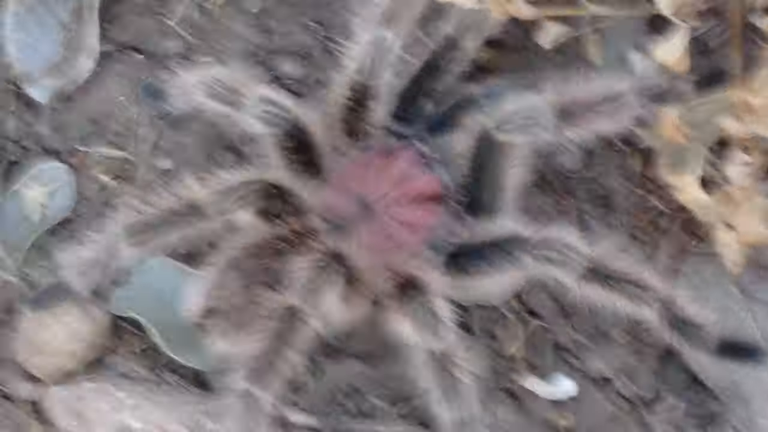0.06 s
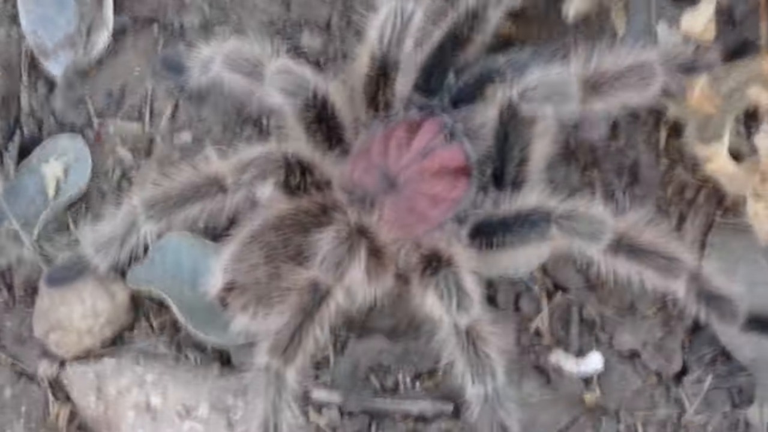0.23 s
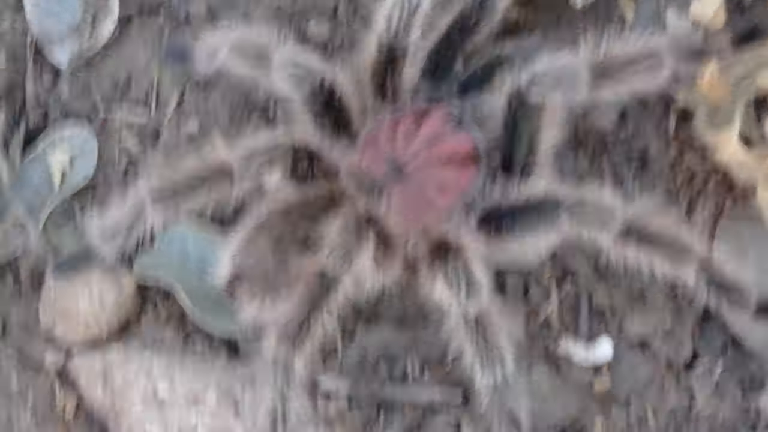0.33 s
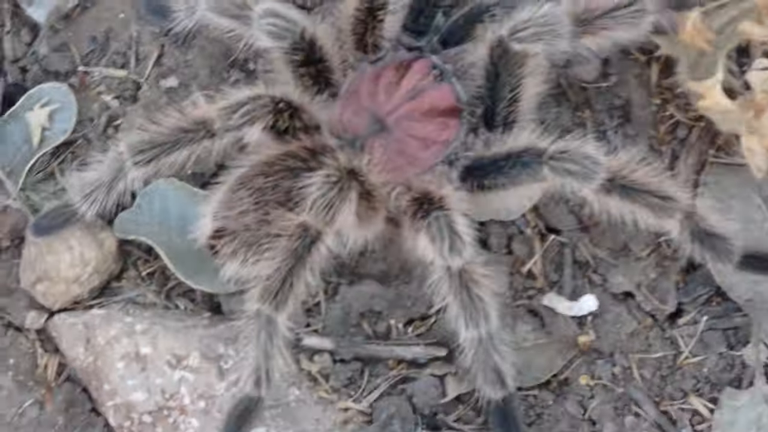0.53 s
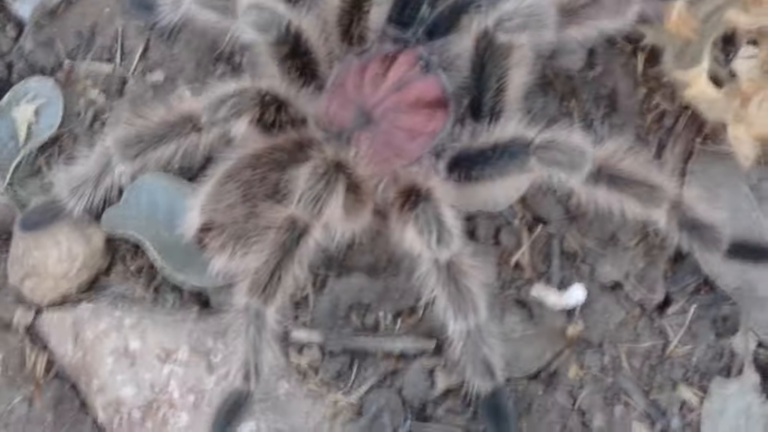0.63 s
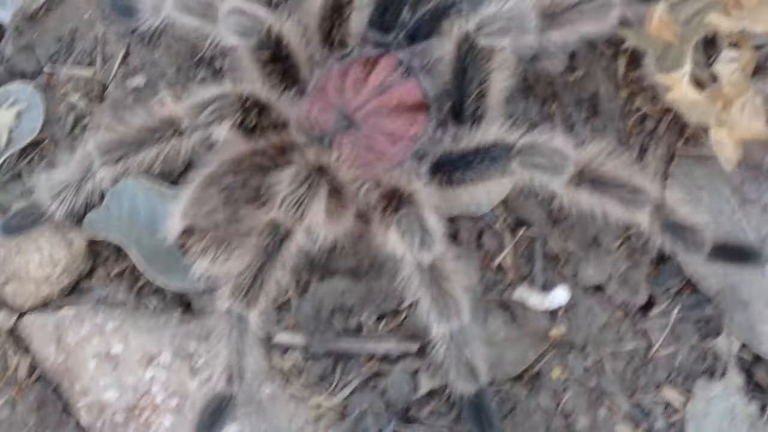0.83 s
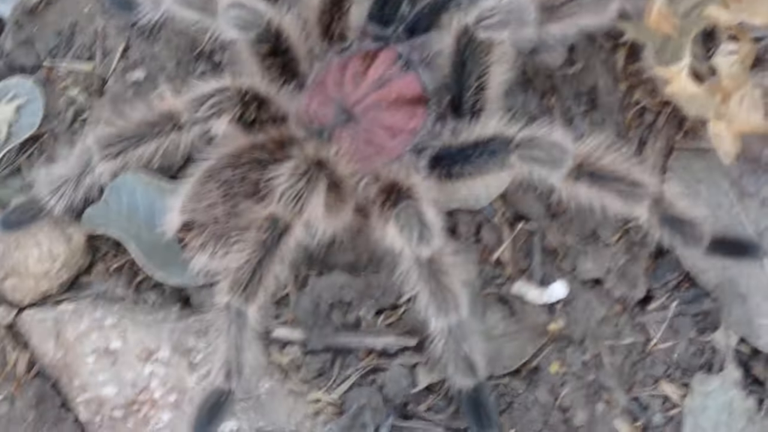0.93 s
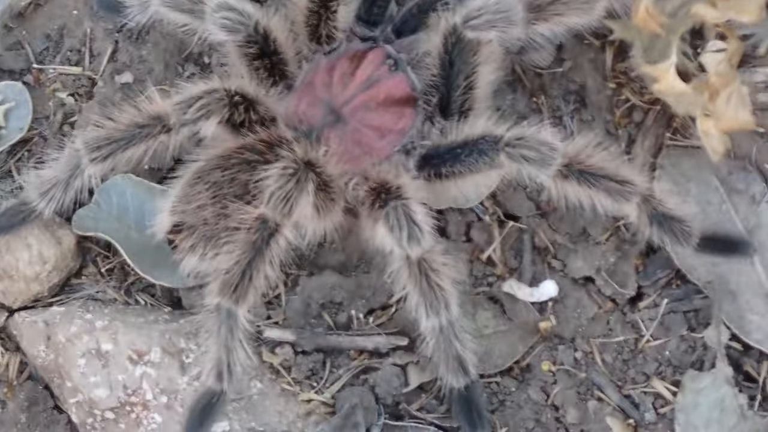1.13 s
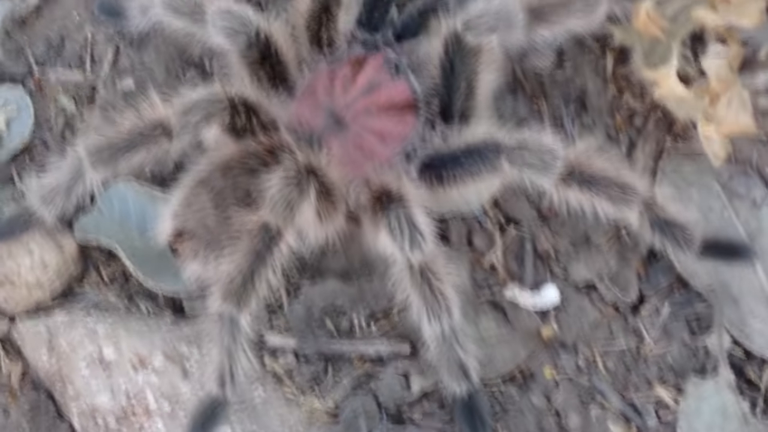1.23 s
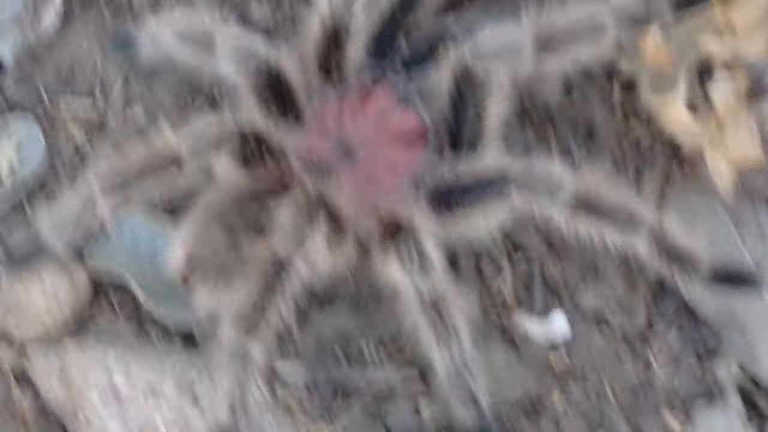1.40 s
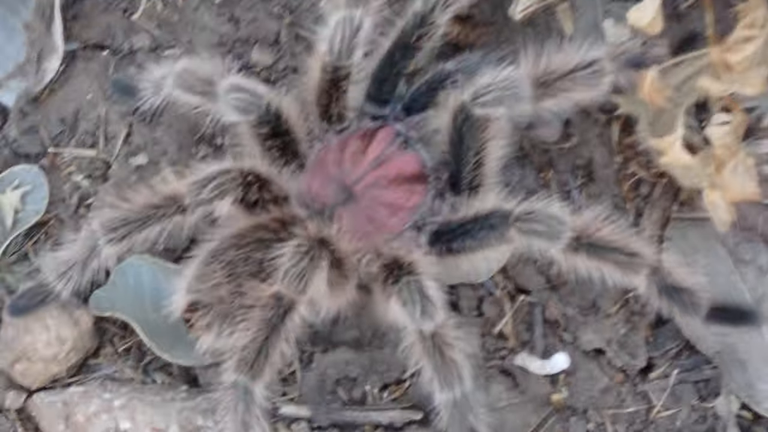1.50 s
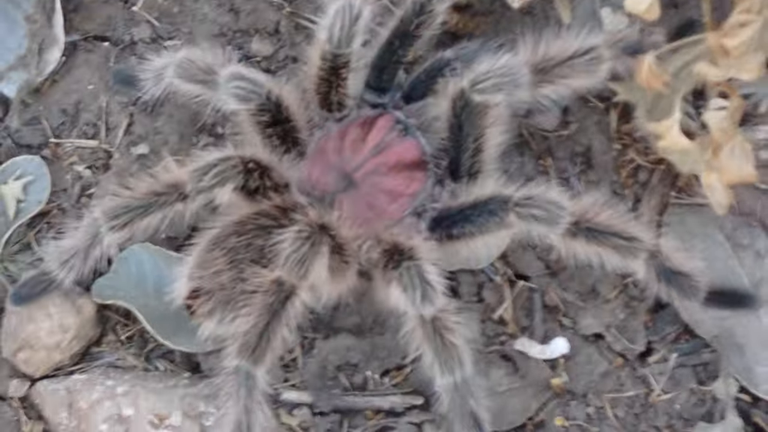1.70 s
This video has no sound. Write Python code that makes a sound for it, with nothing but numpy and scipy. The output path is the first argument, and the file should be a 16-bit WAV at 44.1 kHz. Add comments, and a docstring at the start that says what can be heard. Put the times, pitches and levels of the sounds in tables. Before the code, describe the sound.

Small, sharp, irregular snaps from a gripped camera body, with soft steady hiss behind.

```python
"""The casing of a hand-held camera creaks and ticks under a shifting grip, right beside its stereo mics.
Each snap is a brief run of micro-slips that rings one spot of the shell at its own pitch. The grip
also rubs, and a fingertip bumps the body. The place is outdoors on a still day, with faint air and
steady hiss behind; towards the end a soft rumble builds on the microphone ports."""
import sys
import numpy as np
from scipy import signal
from scipy.fft import rfft, irfft
from scipy.io import wavfile

SR = 44100
rng = np.random.default_rng(int(sys.argv[2]) if len(sys.argv) > 2 else 0)


def put_to_file(sound):
    """Save the sound as 16-bit audio at rate SR, in the file named by the first command-line argument."""
    columns = np.atleast_2d(sound).T  # one column per channel
    safe = np.clip(columns, -1, 1)
    whole_steps = np.round(safe * 32767)
    wavfile.write(sys.argv[1], SR, whole_steps.astype(np.int16))


N = 77175

# Snaps beside the mics; thud, bright and crack are offsets from level_db, ahead of the trims below.
# start_s, level_db, thud_db, bright_db, crack_db, ring_hz, bright_hz
CASING_SNAPS = [(0.1794, -44, -0.5, 3, -21, 3800, 6370), (0.2009, -38, -2.5, 11.5, -17, 3440, 5970),
                (0.2153, -21, -12, 1.5, -27, 3620, 6670), (0.2268, -38.5, 7.5, 19, -12, 4240, 6080),
                (0.2551, -23.5, -9, 10, -17.5, 3590, 7570), (0.259, -21, -20, 9.5, -25, 3530, 6000),
                (0.2667, -26, -11.5, 7.5, -21, 3900, 7900), (0.2744, -27, -4, 15, -22, 3630, 7730),
                (0.2777, -24, -16.5, 9.5, -16, 3690, 7900), (0.2824, -33, -3.5, 8, -25, 3600, 7230),
                (0.2875, -37, -20, 14, -28, 3740, 6600), (0.2997, -18.5, -7.5, 6, -21, 4227, 7460),
                (0.4014, -25, -6.5, -1, -18, 3420, 7330), (0.4747, -45.5, 1.5, 4, -25, 3280, 5540),
                (0.5083, -20.5, -9.5, 2.5, -16, 3990, 6990), (0.548, -48, -2, -9, -27, 3700, 6360),
                (0.6794, -47.5, -28, -5, -21, 4100, 7030), (0.7629, -32, -14, 2.5, -18, 4330, 8020),
                (0.8305, -45, -7, -11, -22, 3930, 7200), (0.8513, -41, -3.5, -4, -24, 3700, 7070),
                (0.8641, -27, -15.5, -12, -24, 3840, 7530), (0.8718, -33.5, -22, -7, -21, 4030, 5640),
                (0.9033, -32, -14, -12, -32, 4070, 5300), (0.9229, -26.5, -13.5, -3.5, -25, 4264, 7570),
                (0.929, -43, -13, -11, -17, 4160, 6250), (1.0236, -26, -6, 7.5, -13, 4200, 6330),
                (1.0272, -26.5, -11.5, 3, -32, 3560, 5800), (1.0386, -37, -6, 1, -27, 3900, 5780),
                (1.0541, -23, -13.5, 7.5, -21, 3930, 6150), (1.1791, -44, -20, -19, -24, 4260, 7250),
                (1.2649, -43, -2.5, 6.5, -9, 3390, 4820), (1.3344, -21, -14, 3, -19, 4360, 5440),
                (1.3364, -20.5, -19, 4.5, -36, 4294, 7260), (1.3457, -27, -4, 8, -13, 4130, 7260),
                (1.3546, -28.5, -5, 6, -24, 3630, 5570), (1.359, -31, -9.5, 5, -22, 3530, 5850),
                (1.3834, -22.5, -8.5, 5, -18, 3660, 7350), (1.449, -23, -17, 7, -23, 4150, 4970),
                (1.4617, -30, -11, 7, -21, 3060, 4860), (1.4699, -33, -13, 1, -23, 4300, 6740),
                (1.4802, -37.5, -32, 6, -19, 4050, 5900), (1.562, -50, 2, 8, -7, 3360, 4670),
                (1.6916, -37.5, -2.5, 6.5, -6, 3200, 4800)]
# Modes of the shell: pitch_hz, level_db, t60_s, likeness (between the two mics, -1 to 1)
SHELL_MODES = [(255, -1.5, 0.0057, 0.7), (644, -1.5, 0.013, 0.43), (810, -4.5, 0.0021, 0.26),
               (1442, -7, 0.011, 0.17), (2323, -4, 0.013, 0.000043), (3300, 7, 0.008, 1),
               (3560, 1.5, 0.021, 0.81), (3950, -1, 0.0026, 0.95), (4310, 0.5, 0.018, 0.98),
               (5210, 5, 0.0089, -0.5), (5785, 3, 0.0058, -0.23), (6340, 0.5, 0.012, -0.88),
               (7630, 6, 0.0029, -0.23), (7924, 2.5, 0.0046, 0.43)]
# The sinking lower edge of the snaps' ring: time_s, cutoff_hz
RING_LOW_EDGE = [(.3, 3390), (.4, 2870), (1.45, 2820)]
# Where the grip presses: time_s, balance_db (always left minus right)
GRIP_BALANCE = [(.25, -3), (.92, -2.5), (1.03, -1.4), (1.7, -0.5)]
# The grip rubbing the shell: start_s, length_s, level_db
GRIP_RUBS = [(.177, 0.057, -40.5), (0.254, 0.042, -45.5), (.828, .115, -57), (1.442, 0.057, -52)]
# A fingertip on the body: start_s, level_db
FINGER_BUMPS = [(0.227, -33), (1.024, -32), (1.055, -31), (1.45, -35.5)]
# Swells of rumble on the mic ports: time_s, level_db
RUMBLE_SWELLS = [(0, -81), (1.099, -53), (1.199, -42), (1.25, -59), (1.29, -42.5), (1.35, -44.5),
                 (1.49, -46), (1.535, -35), (1.58, -49.5), (1.628, -32.5), (1.68, -39.5), (1.731, -27),
                 (1.75, -44)]
# Colour of the rumble: frequency_hz, relative_density_db
RUMBLE_SPECTRUM = [(25, -23), (60, -9), (115, -4.5), (190, -11), (300, -30.5), (700, -47), (2000, -74)]
# Colour of the outdoor air and mic hiss: frequency_hz, relative_density_db
AIR_SPECTRUM = [(30, -13), (60, -6), (120, 0), (350, -5.5), (700, -9.5), (1300, -15.5), (2100, -23),
                (3700, -22.5), (5200, -22), (6800, -20), (8000, -14.5), (9500, -24.5), (15500, -25.5)]
# The air sits slightly left: frequency_hz, balance_db
AIR_BALANCE = [(60, 3.5), (180, 2), (550, 1.5), (15000, 1)]

RING_TRIM_DB, BRIGHT_TRIM_DB, CRACK_TRIM_DB = 3, -1.5, 9.5
THUD_BALANCE_DB, CRACK_BALANCE_DB, RUMBLE_BALANCE_DB = 7, 4.5, 7
THUD_BELOW_HZ, BRIGHT_ABOVE_HZ, CRACK_ABOVE_HZ = 2800, 4800, 9000
RING_LOW_HZ, RING_TOP_HZ = 2850, 8800
SNAP_S, RISE_S, SLIP_DECAY_S, CRACK_DECAY_S = 0.03, 0.00017, 0.00089, 0.0014
SPOT_DB, BRIGHT_SPOT_DB = 2.5, -3   # relative to the shell around the spot
MODE_SPREAD_DB, DETUNE = 1.2, 0.012
RING_SPAN_HZ, BRIGHT_SPAN_HZ, LOSS_PER_SPAN_DB = 520, 2420, 6
GRIP_CENTRES_HZ = (3950, 6300)   # ring and bright centres of rubs and ticks


def snaps():
    """Right at the mics, each snap rings the slipping spot and the shell, led by a thin crack."""
    out, t = np.zeros((2, N)), times(SNAP_S)
    for start_s, level_db, thud_db, bright_db, crack_db, ring_hz, bright_hz in CASING_SNAPS:
        thud, ring, bright = map(unit_burst, casing(micro_slips, ring_hz, bright_hz))
        ring = ring + from_db(SPOT_DB) * slipping_spot(ring_hz, t60_s=0.01)
        ring = unit_burst(butter(ring, at_time(RING_LOW_EDGE, start_s), "high", order=8))
        bright = unit_burst(bright + from_db(BRIGHT_SPOT_DB) * slipping_spot(bright_hz, t60_s=0.0094))
        shell = from_db(RING_TRIM_DB) * ring + from_db(BRIGHT_TRIM_DB + bright_db) * bright
        grit = rng.standard_normal((2, len(t))) * np.exp(-t / CRACK_DECAY_S)
        crack = unit_burst(butter(at_mics(grit, likeness=-0.4), CRACK_ABOVE_HZ, "high"))
        snap = shell * pan(at_time(GRIP_BALANCE, start_s))
        snap += from_db(thud_db) * thud * pan(THUD_BALANCE_DB)
        snap += from_db(CRACK_TRIM_DB + crack_db) * crack * pan(CRACK_BALANCE_DB)
        add(out, start_s, from_db(level_db) * snap)
    return out


def micro_slips():
    """A run of micro-slips flares up and quickly dies, as two unrelated noise bursts."""
    t = times(SNAP_S)
    return rng.standard_normal((2, len(t))) * (1 - np.exp(-t / RISE_S)) * np.exp(-t / SLIP_DECAY_S)


def casing(draw_slips, ring_hz, bright_hz):
    """Slips drive the shell in three registers: thud, ring, bright. Modes near the centres ring most."""
    thud, ring, bright = 0, 0, 0
    for hz, level_db, t60_s, likeness in SHELL_MODES:
        pair = resonate(draw_slips(), hz * (1 + DETUNE * rng.normal()), t60_s)
        pair = [unit_burst(x) for x in pair]
        mode = from_db(level_db + MODE_SPREAD_DB * rng.normal()) * at_mics(pair, likeness)
        if hz < THUD_BELOW_HZ:
            thud += mode
        elif hz < BRIGHT_ABOVE_HZ:
            ring += mode * from_db(-LOSS_PER_SPAN_DB * abs(hz - ring_hz) / RING_SPAN_HZ)
        else:
            bright += mode * from_db(-LOSS_PER_SPAN_DB * abs(hz - bright_hz) / BRIGHT_SPAN_HZ)
    ring, bright = (butter(x, RING_LOW_HZ, "high", order=4) for x in (ring, bright))
    ring, bright = (butter(x, RING_TOP_HZ, "low", order=10) for x in (ring, bright))
    return butter(thud, THUD_BELOW_HZ, "low"), butter(ring, BRIGHT_ABOVE_HZ, "low", order=5), bright


def slipping_spot(hz, t60_s):
    """The spot that slips rings at its own pitch and reaches the mics as the nearest modes do."""
    t = times(SNAP_S)
    likeness = at_hz([(mode[0], mode[-1]) for mode in SHELL_MODES], hz)
    mic_phase = np.arccos(likeness) * np.array([[0], [1]])
    phase = 2 * np.pi * (hz * t + rng.random()) + mic_phase
    swing = np.sin(phase) * (1 - np.exp(-t / RISE_S)) * from_db(-60 * t / t60_s)
    swing = butter(swing, RING_LOW_HZ, "high")
    return unit_burst(butter(swing, RING_TOP_HZ, "low", order=8))


def after_ring(handling, level_db=-20.5, t60_s=0.043, band_hz=(3300, 4300)):
    """The shell's strongest register lingers faintly after snaps and rubs."""
    t = times(0.25)
    tail = butter(rng.standard_normal((2, len(t))), band_hz, "band") * from_db(-60 * t / t60_s)
    lingering = signal.fftconvolve(handling, tail, axes=1)[:, :N]
    return from_db(level_db) * np.std(handling) * unit_rms(lingering)


def rubs(slips_per_s=1300, thud_db=-3.5, bright_db=-5.5):
    """The grip scratches the shell with dense, tiny slips."""
    out = np.zeros((2, N))
    for start_s, length_s, level_db in GRIP_RUBS:
        t = times(length_s + SNAP_S)
        slipping = (rng.random(len(t)) < slips_per_s / SR) & (t < length_s)
        registers = casing(lambda: slipping * rng.standard_normal((2, len(t))), *GRIP_CENTRES_HZ)
        thud, ring, bright = map(unit_rms, registers)
        rub = ring + from_db(thud_db) * thud * pan(THUD_BALANCE_DB) + from_db(bright_db) * bright
        add(out, start_s, from_db(level_db) * rub)
    return out


def bumps(band_hz=(150, 350), t60_s=0.03):
    """A fingertip sends dull, damped thumps through the body to the mics."""
    out, t = np.zeros((2, N)), times(0.1)
    for start_s, level_db in FINGER_BUMPS:
        push = at_mics(rng.standard_normal((2, len(t))), likeness=0.44) * from_db(-60 * t / t60_s)
        thump = unit_burst(butter(push, band_hz, "band"))
        add(out, start_s, from_db(level_db) * thump * pan(THUD_BALANCE_DB))
    return out


def ticks(start_s=0.52, end_s=1.23, per_s=62, level_db=-57.5, spread_db=2.5, bright_db=-10):
    """The grip settles in faint, uneven ticks of the shell."""
    out = np.zeros((2, N))
    for slot_s in np.arange(start_s, end_s, 1 / per_s):
        _, ring, bright = map(unit_burst, casing(micro_slips, *GRIP_CENTRES_HZ))
        tick = ring + from_db(bright_db) * bright
        add(out, slot_s + rng.random() / per_s, from_db(level_db + spread_db * rng.normal()) * tick)
    return out


def rumble():
    """Soft buffeting right on the mic ports, separate at each and heavier on the left."""
    swell = from_db(at_time(RUMBLE_SWELLS, np.arange(N) / SR))
    return swell * coloured_noise(RUMBLE_SPECTRUM, [(1, RUMBLE_BALANCE_DB)], likeness=0)


def air(level_db=-45.5):
    """Still outdoor air all around, with the mics' steady hiss."""
    return from_db(level_db) * coloured_noise(AIR_SPECTRUM, AIR_BALANCE, likeness=0.048)


def coloured_noise(spectrum, balance, likeness):
    """Stereo noise at rms 1, with level and balance set by frequency."""
    hz = np.arange(N // 2 + 1) * SR / N
    common = np.sqrt(likeness) * rng.standard_normal(N)
    separate = np.sqrt(1 - likeness) * rng.standard_normal((2, N))
    gains = from_db(at_hz(spectrum, hz)) * pan(at_hz(balance, hz))
    return unit_rms(irfft(rfft(common + separate) * gains, N))


def resonate(force, hz, t60_s):
    """One mode: each click sets a decaying cosine ringing."""
    radius, angle = from_db(-60 / (t60_s * SR)), 2 * np.pi * hz / SR
    return signal.lfilter([1, 0, -1], [1, -2 * radius * np.cos(angle), radius ** 2], force + 1e-18) / 2


def at_mics(pair, likeness):
    """Two unrelated signals, as mid and side, give left and right with this likeness."""
    return np.sqrt(1 + likeness) * pair[0] + np.sqrt(1 - likeness) * pair[1] * [[1], [-1]]


def pan(balance_db):
    """Left and right gains of constant power."""
    gains = from_db(np.array([[0.5], [-0.5]]) * balance_db)
    return gains / np.sqrt(np.mean(gains ** 2, axis=0))


def from_db(db):
    """Decibels to gain."""
    return 10 ** (np.asarray(db) / 20)


def unit_rms(x):
    """Scale to rms 1."""
    return x / np.sqrt(np.mean(x ** 2) + 1e-20)


def unit_burst(x):
    """Scale to the energy of 5 ms of stereo at rms 1."""
    return x / np.sqrt(np.sum(x ** 2) / (2 * 0.005 * SR) + 1e-20)


def times(length_s):
    """Sample times in seconds."""
    return np.arange(int(length_s * SR)) / SR


def at_time(points, time_s):
    """Read a curve over time."""
    return np.interp(time_s, *np.transpose(points))


def at_hz(points, hz):
    """Read a curve on a log-frequency axis."""
    points_hz, values = np.transpose(points)
    return np.interp(np.log(hz + 1e-9), np.log(points_hz), values)


def butter(x, hz, kind, order=2):
    """Butterworth filter."""
    return signal.sosfilt(signal.butter(order, hz, kind, fs=SR, output="sos"), x)


def add(out, start_s, sound):
    """Mix a sound in at a time."""
    i = int(start_s * SR)
    out[:, i:i + sound.shape[1]] += sound[:, :max(N - i, 0)]


def scene():
    """Close handling noise over outdoor air and port rumble."""
    background = air() + rumble()
    handling = snaps() + rubs()
    return background + handling + after_ring(handling) + bumps() + ticks()


def record(dry):
    """The camera clips any peak over full scale and cuts the top at 15.9 kHz."""
    top_cut = signal.ellip(10, 0.1, 70, 15900, fs=SR, output="sos")
    return signal.sosfilt(top_cut, np.clip(dry, -1, 1))


dry = scene()
out = record(dry)
put_to_file(out)
```